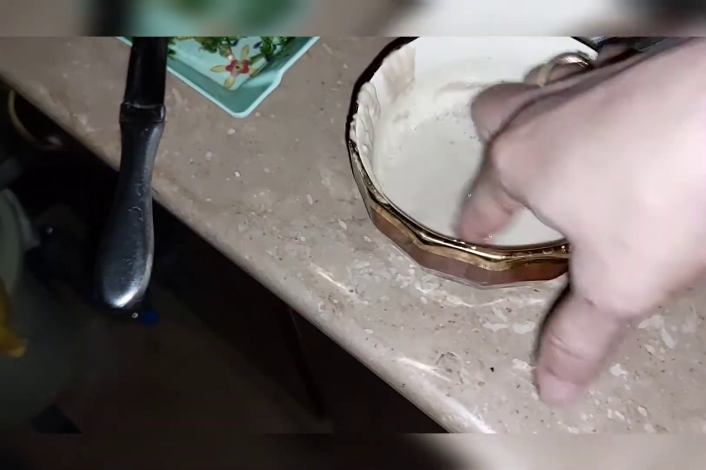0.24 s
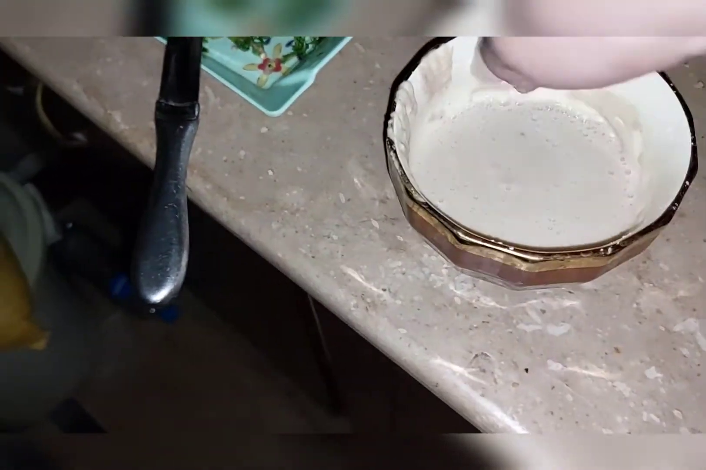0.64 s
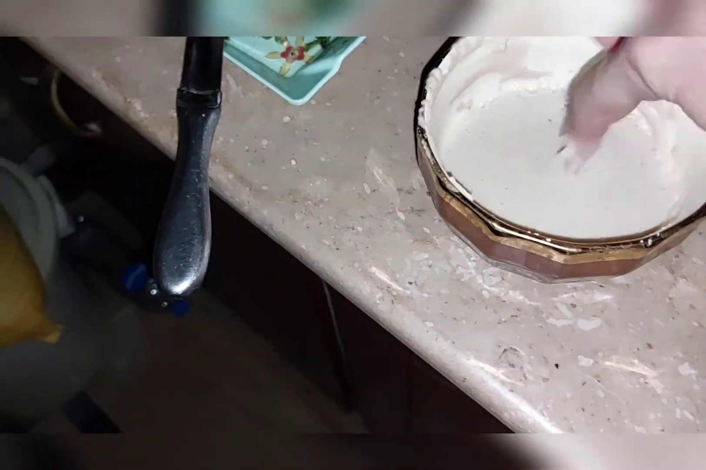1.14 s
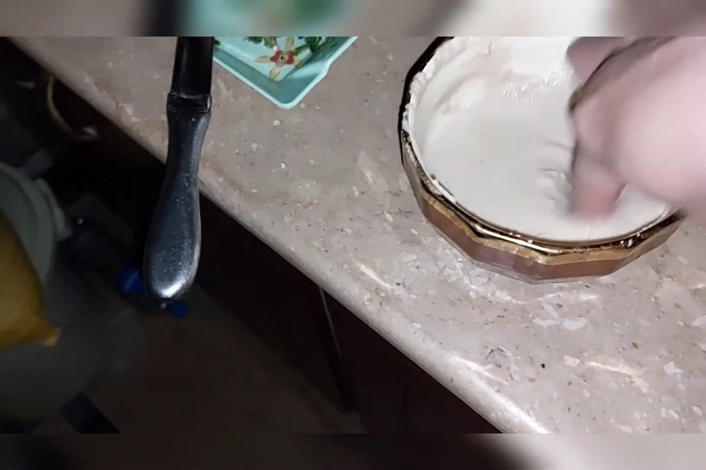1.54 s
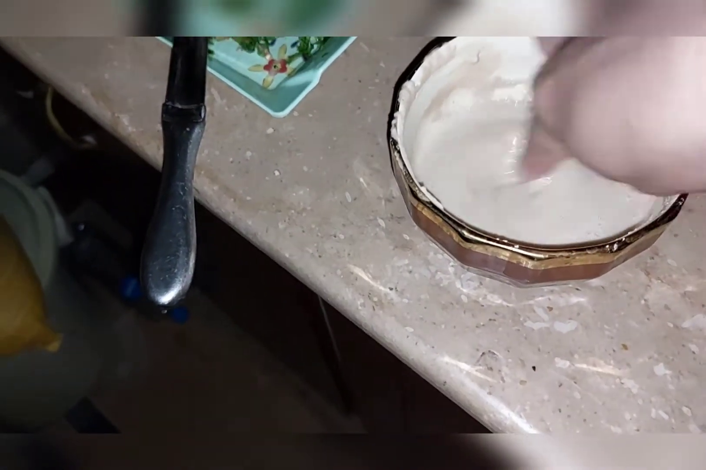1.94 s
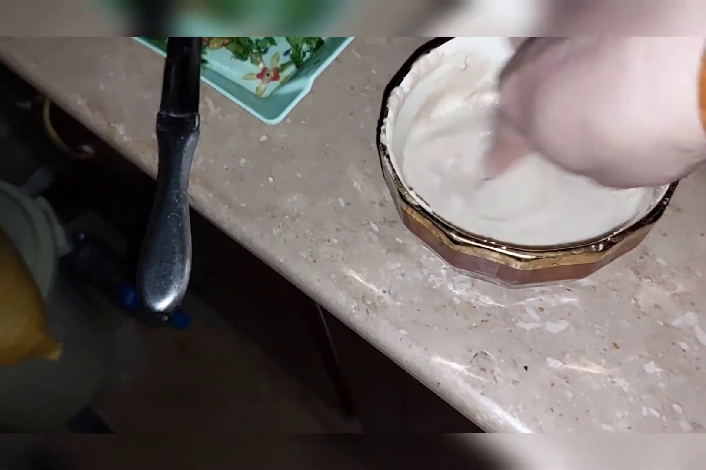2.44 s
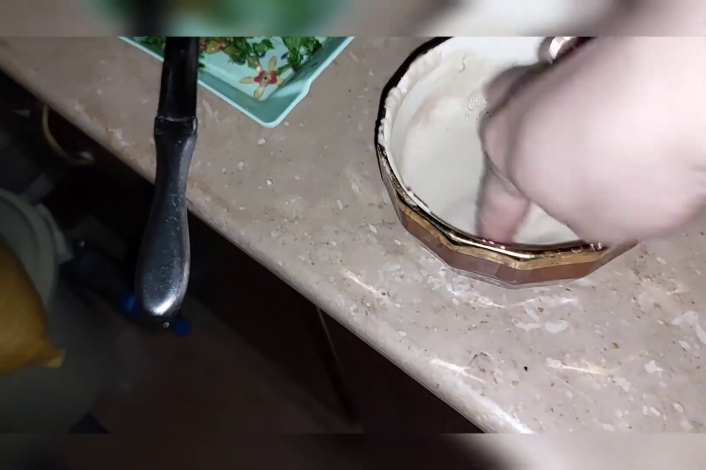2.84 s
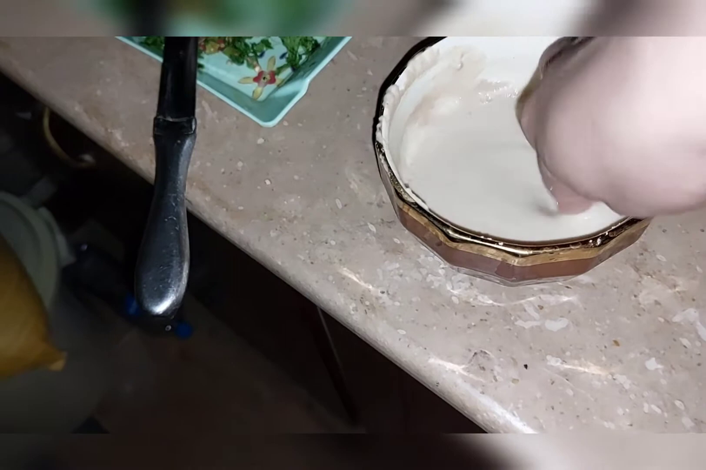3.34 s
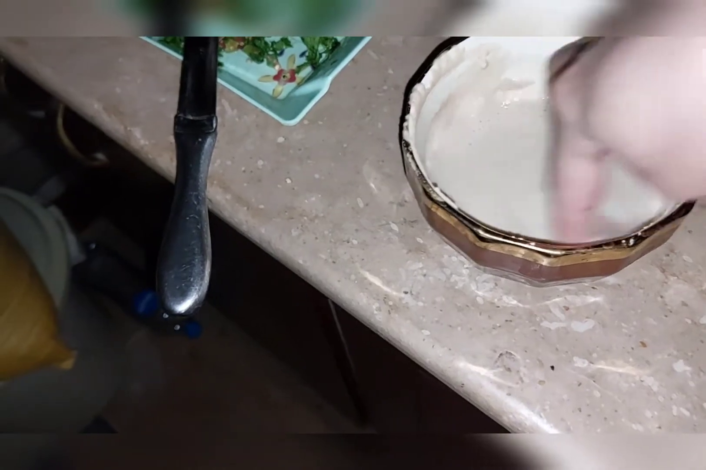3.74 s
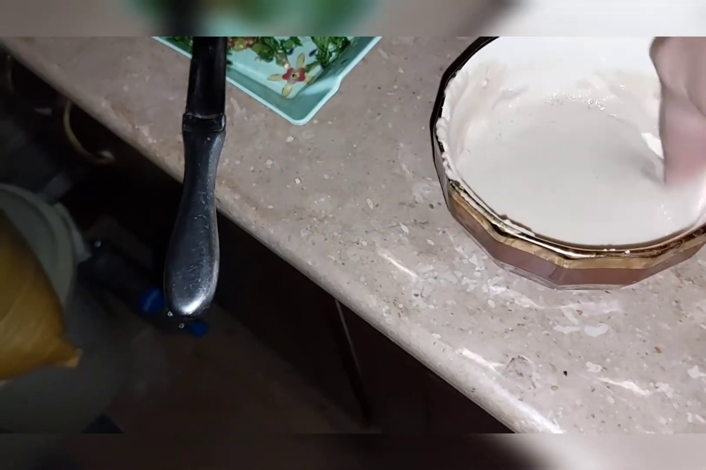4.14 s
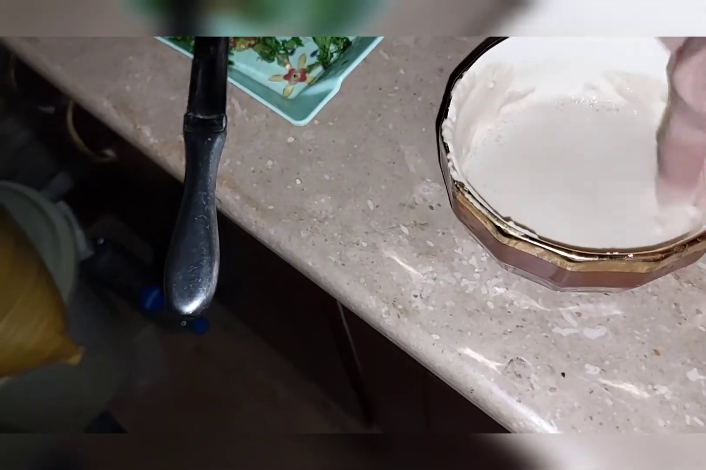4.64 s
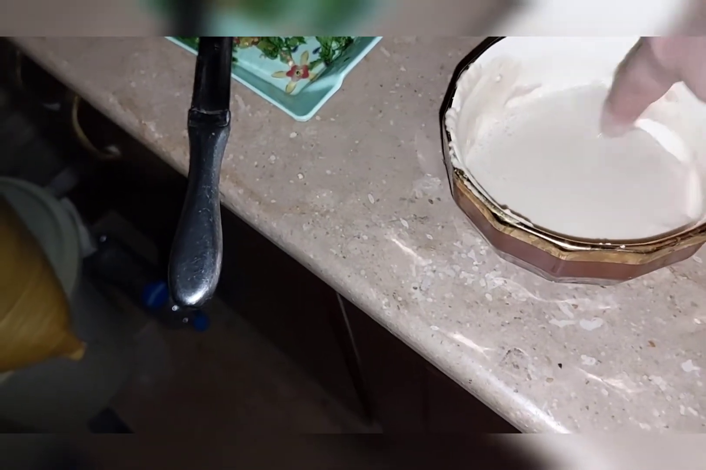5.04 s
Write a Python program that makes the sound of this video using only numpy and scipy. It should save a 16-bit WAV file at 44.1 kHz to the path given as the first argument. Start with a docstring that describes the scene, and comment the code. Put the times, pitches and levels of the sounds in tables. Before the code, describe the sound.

A small ceramic bowl slides on a stone counter and lands with a hard, briefly ringing clack. A finger stirs thin batter with quiet wet lapping while the rocking bowl bumps softly many times. Tiny wet ticks follow, then a short scrape and another hard knock. Light slides and a faint bump finish. The microphone is close, in a kitchen with low rumble and hiss.

```python
"""A finger stirs thin batter in a small ceramic bowl on a stone kitchen counter, close to a phone.
Over a low rumble and microphone hiss, the bowl slides and lands hard on its foot, ringing in the room.
From about 0.8 s the batter laps quietly and the finger wipes the wet wall. The rocking bowl then bumps
softly many times, knocking harder near 2.3 s. Tiny wet ticks join in from 3.5 s, and near 4 s the bowl
scrapes the stone and knocks hard. A last stir, a few light slides and one faint bump close the scene."""
import sys
import numpy as np
from scipy import signal
from scipy.fft import rfft, irfft, next_fast_len
from scipy.io import wavfile

SR = 44100
rng = np.random.default_rng(int(sys.argv[2]) if len(sys.argv) > 2 else 0)


def int16_out(signal):
    """Quantize to a 16-bit WAV file."""
    q = np.round(np.clip(np.atleast_2d(signal).T, -1, 1) * 32767)
    wavfile.write(sys.argv[1], SR, q.astype(np.int16))


N = 233453
T = np.arange(N) / SR

# The tone of the room's rumble and the microphones' hiss. Each row: frequency in Hz, relative level in dB.
RUMBLE_TONE = [(15, -53), (25, 2.5), (70, -3), (102, -1.5), (170, -14), (289, -5), (464, -12), (544, -8),
               (840, -13.5), (1060, -17.5), (1550, -20), (1890, -25), (2800, -29), (3640, -35),
               (6160, -120)]
HISS_TONE = [(1650, -27.5), (2800, -32.5), (3500, -19), (3930, 2), (4400, -5.5), (5160, -1), (5660, -9.5),
             (6780, -1.5), (7880, -3), (8530, -7), (9780, -8), (10400, -12), (11200, -8.5), (12100, -14),
             (15600, -14)]
# Which side the background leans to. Each row: frequency in Hz, left minus right in dB.
BACKGROUND_LEAN = [(60, 6), (150, 22), (400, -2.5), (2000, 6), (5000, 1), (9000, 0.5), (13000, -4.5)]
# How alike room sound is on both sides. Each row: frequency in Hz, likeness (0 unrelated, 1 the same).
STEREO_LIKENESS = [(50, 0.97), (250, 0.83), (500, 0.38), (1100, 0), (2000, 0.087)]
# Echoes off nearby things at each microphone. Each row: delay in milliseconds, strength as a factor.
ECHOES_LEFT = [(3.0, 0.3), (6.0, 0.13), (7.1, 0.21), (9.1, 0.47), (13.1, 0.103), (19.5, 0.22)]
ECHOES_RIGHT = [(4.1, 0.48), (5.2, 0.59), (6.2, 0.39), (9.9, 0.16), (12.8, 0.24), (24.0, 0.11)]
# How long the kitchen echoes. Each row: frequency in Hz, seconds to fade by 60 dB.
ROOM_FADES = [(150, 0.97), (500, 0.54), (1500, 0.42), (4000, 0.65), (12000, 0.26)]
# Spells of stirring. Each row: start in seconds, length in seconds, level in dB.
STIRS = [(0.824, 0.29, -63.5), (1.021, 0.19, -61.5), (1.227, 2.6, -68), (4.386, 0.77, -65.5)]
# The tone of lapping batter. Each row: frequency in Hz, relative level in dB.
LAP_TONE = [(90, 0), (200, -0.5), (300, -4), (365, 15.5), (440, 3.5), (600, -6.5), (900, -24),
            (1300, -17.5), (2300, -9), (4000, -69.5)]
# Wet films snap at the finger. Each row: start in seconds, pitch in Hz, level in dB.
WET_TICKS = [(3.518, 1920, -55), (4.053, 7600, -43), (4.422, 2370, -51.5), (4.692, 2220, -46.5),
             (4.836, 2060, -52.5), (5.274, 2200, -52.5)]
# Brief hisses: the finger wiping the wall, and the bowl's foot scraping the stone around 4 s. Each row:
# start in seconds, length in seconds, level in dB, pitch in Hz, vibrations each tiny click rings for.
BRIEF_HISSES = [(0.859, 0.14, -74, 1270, 30), (0.948, 0.18, -79.5, 2080, 14), (1.513, 0.057, -76, 2220, 12),
                (1.52, 0.1, -74, 9000, 4), (3.835, 0.083, -69.5, 11000, 4), (3.854, .125, -71, 2050, 10),
                (3.942, .18, -70, 11500, 4.7), (4.621, 0.082, -74.5, 2390, 4),
                (4.869, 0.14, -64.5, 2150, 7), (4.874, 0.076, -64, 4670, 4)]
# Soft, low thumps of the hand. Each row: start in seconds, pitch in Hz, level in dB.
HAND_THUMPS = [(1.14, 66, -44), (4.088, 95, -49)]
# The finger shoves the bowl along. Each row: start in seconds, length in seconds, strength in dB,
# frequency in Hz above which the push is muffled.
SHOVES = [(0.0, 0.043, -50, 2370), (0.026, 0.086, -43, 420), (0.091, 0.033, -32, 695),
          (1.034, 0.049, -55, 560), (1.451, 0.027, -60.5, 423), (1.563, .09, -52, 420),
          (2.301, 0.27, -52, 405), (3.267, 0.027, -58, 690), (3.821, 0.033, -54, 900),
          (3.85, 0.11, -48, 1220), (3.861, 0.056, -38.5, 470), (3.935, 0.014, -42, 700),
          (4.498, 0.036, -48, 504), (4.599, 0.041, -52, 680), (4.618, 0.049, -46.5, 680),
          (4.627, 0.037, -59, 1400), (4.83, 0.11, -52.5, 650), (4.858, 0.039, -55.5, 1150)]
# The tone of the bowl's short clack on stone. Each row: frequency in Hz, relative level in dB.
CLACK_TONE = [(60, -70.5), (160, -30.5), (300, -14.5), (460, -9.5), (590, -2.5), (760, 0), (1020, -1),
              (1230, -2.5), (1680, -6.5), (2200, -7.5), (2700, -19.5), (3400, -15.5), (5000, -19.5),
              (12000, -28)]
# The notes that bowl and counter ring with. Each row: pitch in Hz, level in dB when spot 0 of the foot
# lands, level in dB when spot 1 lands, seconds to fade by 60 dB before extra damping.
BOWL_NOTES = [(146, -36, -42, .6), (215, -39, -37, .3), (250, -35, -35, .3), (291, -22.5, -24.5, .38),
              (335, -30, -34, .3), (423, -33, -26, .34), (445, -33, -23, .34), (475, -33, -27, .3),
              (524, -27, -28, .38), (545, -30, -32, .32), (591, -36, -25, .3), (641, -26, -30, .36),
              (660, -21, -21.5, .38), (690, -28, -31, .3), (776, -27, -24, .32), (797, -26, -24, .3),
              (829, -28, -30, .33), (914, -35, -24, .3), (955, -28, -35, .3), (1009, -22, -29, .44),
              (1055, -37, -27, .38), (1126, -31, -22, .32), (1150, -30, -39, .35), (1233, -34, -35, .34),
              (1330, -30, -34, .38), (1365, -29, -36, .26), (1416, -41, -30, .34), (1572, -36, -35, .36),
              (1620, -23.5, -23, .39), (1658, -36, -37, .4), (1868, -36, -35, .28), (1925, -38, -30, .32),
              (2202, -32, -36, .34), (2320, -38, -39, .33), (2503, -34, -34, .22), (2848, -42, -42, .42),
              (3061, -33, -34, .34), (4050, -47, -47, .6)]
# The rocking bowl lands on its foot. Each row: start in seconds, strength in dB, clunk pitch in Hz,
# boosts in dB for the low body, the hard edge and the ringing, spot on the foot from 0 to 1.
LANDINGS = [(0.002, -27.5, 466, -1.5, 7, 5.5, 0.54), (0.1082, -7.5, 1000, -2, 3, 0.5, 0.18),
            (1.491, -38, 715, -1.5, -4, -2, 1), (1.7642, -33, 750, 6, 9, -1, 0.4),
            (1.781, -45, 695, 2, 13, -8, 0.6), (1.9282, -40, 710, -5, 13, 3, 0.6),
            (1.957, -42, 665, 6, -2, -7, 0.64), (2.183, -29.5, 706, -4, -1.5, 2, .3),
            (2.218, -40.5, 437, -5, -3, 9.5, .5), (2.2525, -18, 800, 6, 0.5, -3.5, 0.34),
            (2.439, -38.5, 750, -2, 1, 1.5, 0.7), (2.5232, -38, 664, -0.5, 5, 7.5, 1),
            (2.6935, -30, 1016, -11, 10.5, 4.5, .3), (2.730, -35.5, 630, -8, 3, -1, 0.7),
            (2.7669, -30.5, 750, 3, 11, 2, 0.3), (2.795, -38, 653, 2, 6, -7, 0.3),
            (2.935, -30.5, 680, -10.5, 6, 2, 0.55), (2.957, -37, 744, -5, -7, 0.5, 0.7),
            (2.987, -38, 727, 1, 2, -5, 0.47), (3.179, -37, 750, -1, 7.5, 6, 1),
            (3.261, -34, 730, -4, 1, 2.5, 0.8), (3.369, -48.5, 550, -16, 10.5, 7.5, 0.9),
            (3.7407, -37.5, 712, -8, -10, 5.5, 0.95), (3.9744, -10.5, 1105, 1, -4.5, -2.5, 1),
            (5.273, -46, 820, 2, 16, 6.5, 0.8)]

RIGHT_LAG_MS = 0.08  # sound reaches the right microphone this much later
# Pairs are (soft bump, hard knock), blended by by_strength(). Levels are relative to the blow.
SNAP_DB, CRACK_DB, SETTLE_DB = (-27, -15.5), (-33, -7), (-22.5, -25)
CLUNK_DB, CLUNK_CYCLES = (-4.5, -12), (26, 21)
REBOUND_S, REBOUND_DB = (0.036, .073), (-12.5, -22.5)
SKID_S, SKID_DB = (.03, 0.065), (-22, -40.5)
PAN_DB = (-2.5, 0.5)  # left minus right


def undb(db):
    """Turn decibels into a factor to multiply by."""
    return 10 ** (np.asarray(db) / 20)


def level(x, db):
    """Scale a sound to an average (rms) level."""
    return x * undb(db) / np.sqrt(np.mean(x ** 2) + 1e-30)


def read(points, hz):
    """Read between (Hz, value) points, giving every octave the same space."""
    f, value = np.transpose(points)
    return np.interp(np.log(np.maximum(hz, 1)), np.log(f), value)


def colour(x, points):
    """Shape the tone of a sound with (Hz, dB) points."""
    n = x.shape[-1]
    size = next_fast_len(n)
    gain = undb(read(points, np.arange(size // 2 + 1) * SR / size))
    return irfft(rfft(x, size) * gain, size)[..., :n]


def shortest_click(points, size=2048):
    """The shortest click whose tone follows these (Hz, dB) points, with a peak of 1."""
    gain = undb(read(points, np.arange(size // 2 + 1) * SR / size))
    cepstrum = irfft(np.log(gain))
    # folding the second half onto the first packs the energy at the start
    cepstrum[1:size // 2] *= 2
    cepstrum[size // 2 + 1:] = 0
    click = irfft(np.exp(rfft(cepstrum)))
    return click / np.abs(click).max()


def lowpass(x, hz, order=3):
    """Muffle everything above a frequency."""
    return signal.sosfilt(signal.butter(order, min(hz, SR / 2 - 1), fs=SR, output="sos"), x + 1e-18)


def boost(x, db, hz, width_hz):
    """Raise or lower one band of frequencies."""
    band = signal.lfilter(*signal.iirpeak(hz, hz / width_hz, fs=SR), x + 1e-18)
    return x + (undb(db) - 1) * band


def convolve(x, response):
    """Play a sound through a response: the way a thing answers a single click."""
    return signal.fftconvolve(np.atleast_2d(x), np.atleast_2d(response), axes=1)[:, :N]


def fade(t, fade_s):
    """A curve that falls by 60 dB every fade_s seconds."""
    return np.exp(-np.log(1000) * t / fade_s)


def add(out, s, x):
    """Mix a sound in, starting at s seconds."""
    start = max(int(s * SR), 0)
    part = out[..., start:start + x.shape[-1]]
    part += x[..., :part.shape[-1]]


def crackle(n, rate, spread_db):
    """Tiny random clicks of uneven size, about rate of them a second."""
    clicks = (rng.random(n) < rate / SR) * rng.standard_normal(n)
    return clicks * undb(spread_db * rng.standard_normal(n))


def pop(hz, db, cycles):
    """A short tone that dies away over the given number of vibrations."""
    t = T[:SR // 4]
    return undb(db) * np.sin(2 * np.pi * hz * t) * fade(t, cycles / hz)


def room_noise(n):
    """Stereo noise from all around: long waves arrive alike at both microphones."""
    shared, apart = rng.standard_normal((2, n))
    likeness = [(hz, np.clip(alike, -.95, .95)) for hz, alike in STEREO_LIKENESS]
    shared = colour(shared, [(hz, 10 * np.log10(1 + alike)) for hz, alike in likeness])
    apart = colour(apart, [(hz, 10 * np.log10(1 - alike)) for hz, alike in likeness])
    return np.array([shared + apart, shared - apart])


def background():
    """The room rumbles steadily and the microphones add their own hiss."""
    rumble = level(colour(room_noise(N), RUMBLE_TONE), db=-64)
    hiss = level(colour(rng.standard_normal((2, N)), HISS_TONE), db=-72.5)
    return np.array([colour(side, [(hz, sign * db / 2) for hz, db in BACKGROUND_LEAN])
                     for side, sign in zip(rumble + hiss, (1, -1))])


def kitchen(rise_s=.012):
    """How the room answers a click: the direct sound, a few near echoes, then a fading wash."""
    t = T[:SR * 3 // 4]
    spectrum = rfft(room_noise(len(t)))
    hz = np.arange(spectrum.shape[1]) * SR / len(t)
    wash = 0
    for centre_hz, fade_s in ROOM_FADES:
        band = read([(f, f == centre_hz) for f, _ in ROOM_FADES], hz)
        wash = wash + irfft(spectrum * band, len(t)) * fade(t, fade_s)
    wash = wash * (1 - np.exp(-t / rise_s)) ** 2
    response = level(wash, db=-5.5) / np.sqrt(len(t))
    direct = (0.044, 0.88)  # delay in milliseconds, strength
    for side, lag_ms, echoes in zip(response, (0, RIGHT_LAG_MS), (ECHOES_LEFT, ECHOES_RIGHT)):
        for ms, strength in [direct, *echoes]:
            side += strength * np.sinc((t - (ms + lag_ms) / 1000) * SR)
    return response


def batter_motion(ramp_s=0.034, slosh_limit_db=-52.5):
    """How much the batter moves: steadily while stirred, with a fading slosh after each landing."""
    power = np.zeros(N)
    for s, length, db in STIRS:
        stirring = np.clip(np.minimum(T - s, s + length - T) / ramp_s, 0, 1)
        power += (undb(db) * stirring) ** 2
    for s, db, *_ in LANDINGS:
        slosh_db = min(db - 28.5, slosh_limit_db)  # batter can sway only so far
        add(power, s, (undb(slosh_db) * fade(T[:SR], fade_s=0.71)) ** 2)
    return np.sqrt(power)


def batter(bubbles_per_s=55, middle_hz=430, cycles=10, glide=.2):
    """Batter laps against the wall and folds in dull little bubbles, whose pitch rises as they close."""
    plops = np.zeros(N)
    t = T[:SR // 10]
    for when, pitch, size in rng.random((int(bubbles_per_s * N / SR), 3)):
        hz = middle_hz * 2 ** (1.6 * (pitch - .5))
        life_s = cycles / hz
        phase = 2 * np.pi * hz * t * (1 + glide * t / life_s / 2)
        envelope = fade(t, life_s) * (1 - np.exp(-t * hz))
        add(plops, when * N / SR, undb(10 * size) * np.sin(phase) * envelope)
    laps = colour(crackle(N, rate=500, spread_db=2), LAP_TONE)
    return (level(plops, db=-9) + level(laps, db=-5)) * batter_motion()


def brief_hisses():
    """Rubbing makes a fizz of tiny clicks: the finger on the wet wall, or the bowl's foot on stone."""
    out = np.zeros(N)
    for s, length, db, hz, cycles in BRIEF_HISSES:
        n = int(length * SR)
        grains = crackle(SR // 2, rate=4000, spread_db=3)
        fizz = convolve(grains, pop(hz, 0, cycles))[0, :n]
        add(out, s, level(fizz, db) * np.hanning(n))
    return out


def finger():
    """Wet films snap at the finger, and the hand thumps softly."""
    out = np.zeros(N)
    for s, hz, db in WET_TICKS:
        add(out, s, pop(hz, db, cycles=12))
    for s, hz, db in HAND_THUMPS:
        add(out, s, pop(hz, db, cycles=3.1))
    return out


def by_strength(db, soft_and_hard, hard_from_db=-22):
    """Weak blows get the soft value; strong ones move up to two thirds of the way to the hard one."""
    soft, hard = soft_and_hard
    return soft + (hard - soft) / (1.5 + np.exp(hard_from_db - db))


def contact_hz(db, cushioned_db=-22, db_per_octave=9):
    """How high a blow's sound reaches: dull while the finger cushions it, then brighter with force."""
    return 744 * 2 ** (max(db - cushioned_db, 0) / db_per_octave)


def clack(room):
    """The short clack of bowl on stone, thrown round the room."""
    return convolve(shortest_click(CLACK_TONE), room)[:, :room.shape[1]]


def bowl_notes(rise_s=0.0019, damping=1.21):
    """Bowl and counter vibrate at their own pitches: one fading stereo tone for each."""
    t = T[:SR * 3 // 4]
    notes = []
    for hz, _, _, fade_s in BOWL_NOTES:
        # short waves reach the two microphones out of step
        apart = min(hz / 550, 1.0) * rng.choice([-1, 1]) * rng.uniform(.55, .9) * np.array([[1], [-1]])
        phase = 2 * np.pi * hz * t + rng.uniform(0, 2 * np.pi)
        notes.append(fade(t, fade_s / damping) * np.sin(phase + apart))
    return np.array(notes) * (1 - np.exp(-t / rise_s)) ** 2


def ring(notes, spot):
    """The spot on the foot that lands sets how loud each note rings; no two blows are quite alike."""
    _, spot_0_db, spot_1_db, _ = np.transpose(BOWL_NOTES)
    db = spot_0_db + np.clip(spot, 0, 1) * (spot_1_db - spot_0_db)
    return np.tensordot(undb(db + rng.standard_normal(len(BOWL_NOTES))), notes, 1)


def skids(delay_s=0.0056):
    """The foot skids to rest after every landing. The rows are laid out like those of SHOVES."""
    return [(s + delay_s, by_strength(db, SKID_S), db + by_strength(db, SKID_DB), 0.71 * contact_hz(db))
            for s, db, *_ in LANDINGS]


def slides(bowl, room, pan_db=-3):
    """The sliding foot sticks and slips, shaking the bowl; grit under it gives a fine hiss."""
    force, grit = np.zeros(N), np.zeros(N)
    for s, length, db, hz in [*SHOVES, *skids()]:
        n = int(length * SR)
        press = signal.windows.tukey(n, .25)
        slips = crackle(SR // 2, rate=900, spread_db=2)[:n]
        grains = crackle(SR // 2, rate=6000, spread_db=4)[:n]
        grit_db = db - 24 + 12 * np.log2(hz / 1000)  # a harder contact grinds more
        add(force, s, lowpass(level(slips, db) * press, hz))
        add(grit, s, level(grains, grit_db) * press)
    shake = convolve(force, bowl) / np.sqrt(np.sum(bowl ** 2) / 2)
    grit = grit - lowpass(grit, hz=3000, order=1)  # thin out the lows
    grit = lowpass(grit, hz=7500, order=2)
    return shake * undb(np.array([[pan_db], [-pan_db]]) / 2) + convolve(grit, room)


def settle(length_s=.019):
    """The bowl's weight comes down on the stone: a brief thud of falling pitch."""
    t = T[:int(length_s * SR)]
    return signal.chirp(t, f0=544, t1=length_s, f1=235) * np.hanning(len(t))


def crack(db):
    """The stiff foot cracks against the stone for a few milliseconds, most of all in a hard landing."""
    return lowpass(pop(hz=2080, db=by_strength(db, CRACK_DB), cycles=15), hz=3100, order=4)


def blow(db, snap_hz=6720):
    """The force of one landing: the main push, a faint bright snap of the glaze and one soft rebound."""
    rebound_db = db + by_strength(db, REBOUND_DB)
    pushes = [(0, db, contact_hz(db)),
              (0, db + by_strength(db, SNAP_DB), snap_hz),
              (by_strength(db, REBOUND_S), rebound_db, contact_hz(rebound_db))]
    force = np.zeros(SR // 6)
    for delay_s, push_db, hz in pushes:
        add(force, delay_s, undb(push_db) * lowpass(signal.unit_impulse(2048), hz))
    return force


def knocks(room_clack, notes, settle_delay_s=0.0042):
    """Each landing makes the bowl clack, ring, shudder on its foot with a clunk, and settle."""
    out = np.zeros((2, N))
    for s, db, clunk_hz, body_db, edge_db, ring_db, spot in LANDINGS:
        bowl = room_clack + undb(ring_db) * ring(notes, spot)
        clunk = pop(clunk_hz, by_strength(db, CLUNK_DB), by_strength(db, CLUNK_CYCLES))
        foot = clunk + crack(db)
        add(bowl[0], 0, foot)
        add(bowl[1], RIGHT_LAG_MS / 1000, foot)
        # where the bowl lands decides how much low body and hard edge it has
        force = boost(blow(db), body_db, hz=200, width_hz=110)
        force = boost(force, edge_db, hz=1252, width_hz=175)
        pan_db = by_strength(db, PAN_DB) * np.array([[1], [-1]]) / 2
        add(out, s, undb(pan_db) * convolve(force, bowl))
        add(out, s + settle_delay_s, undb(pan_db + db + by_strength(db, SETTLE_DB)) * settle())
    return out


def scene():
    """Bowl, batter and finger in the kitchen; the bowl rings less while it is pressed along the stone."""
    room = kitchen()
    room_clack = clack(room)
    notes = bowl_notes()
    pressed_bowl = room_clack + undb(-5) * ring(notes, spot=1.0)
    bowl = knocks(room_clack, notes) + slides(pressed_bowl, room)
    small_sounds = convolve(batter() + brief_hisses() + finger(), room)
    return background() + small_sounds + bowl


def record(dry, bottom_hz=34, top_hz=15750):
    """The phone cuts the deepest bass and the highest treble."""
    dry = signal.sosfilt(signal.butter(6, bottom_hz, "high", fs=SR, output="sos"), dry)
    return signal.sosfilt(signal.ellip(10, .1, 70, top_hz, fs=SR, output="sos"), dry)


dry = scene()
out = record(dry)
int16_out(out)
```